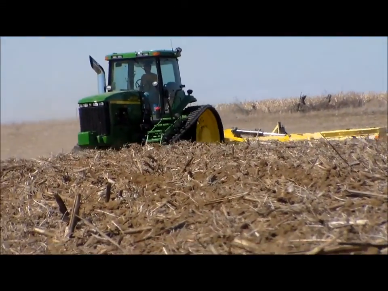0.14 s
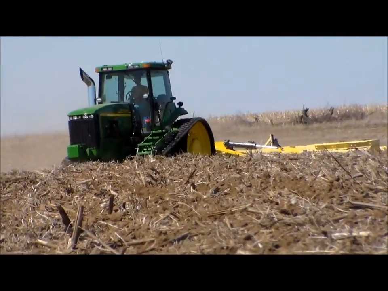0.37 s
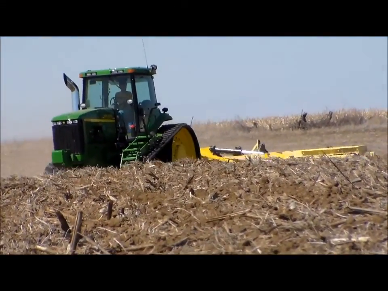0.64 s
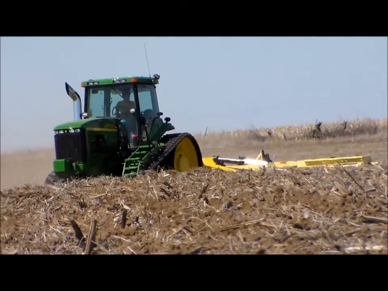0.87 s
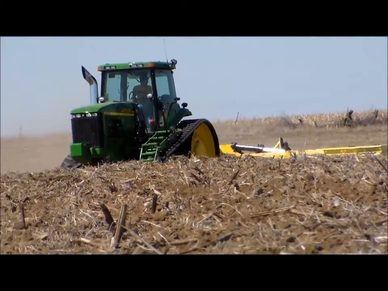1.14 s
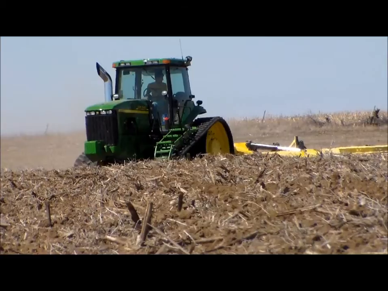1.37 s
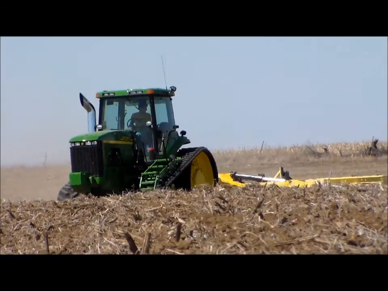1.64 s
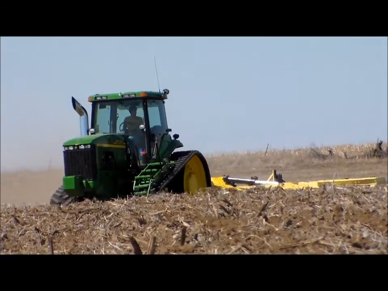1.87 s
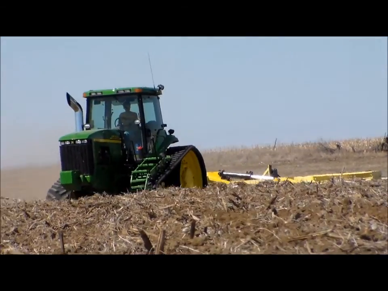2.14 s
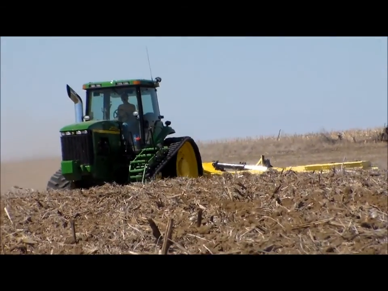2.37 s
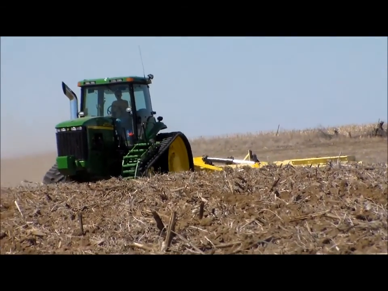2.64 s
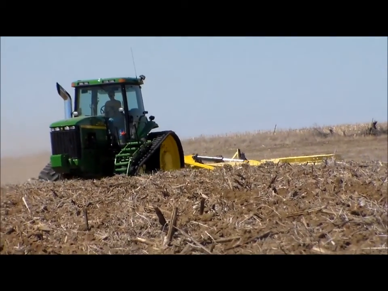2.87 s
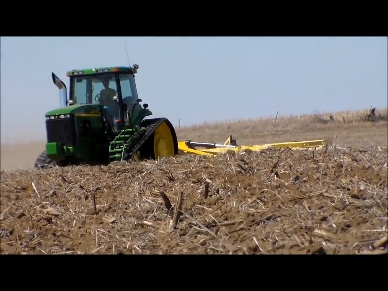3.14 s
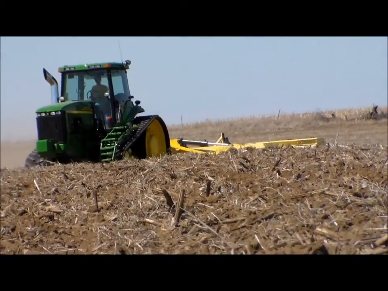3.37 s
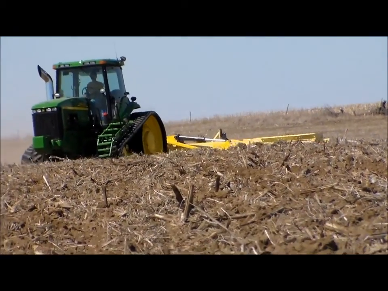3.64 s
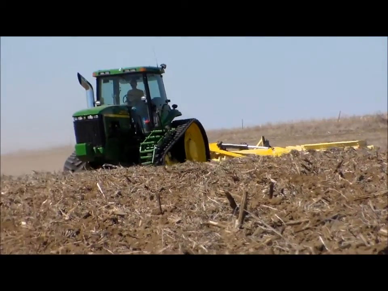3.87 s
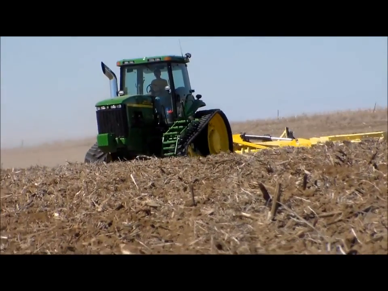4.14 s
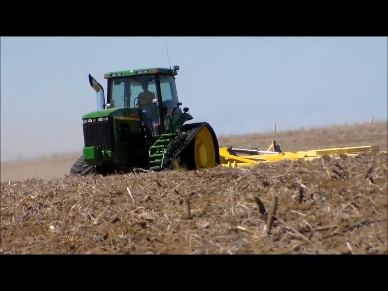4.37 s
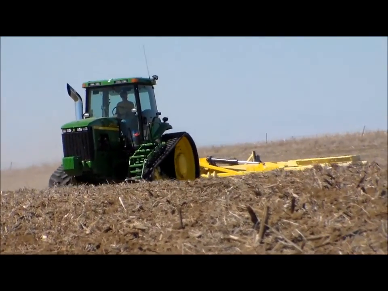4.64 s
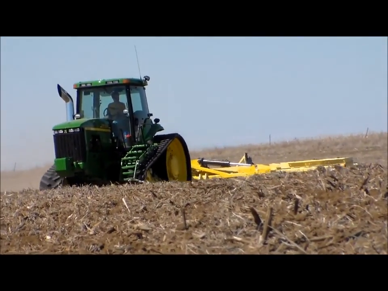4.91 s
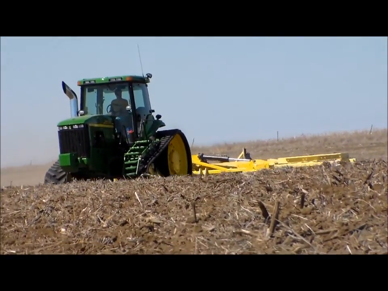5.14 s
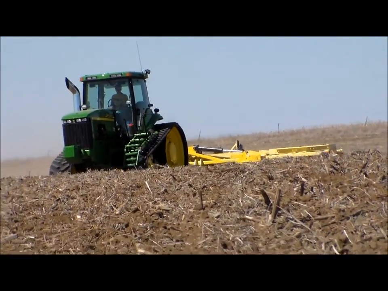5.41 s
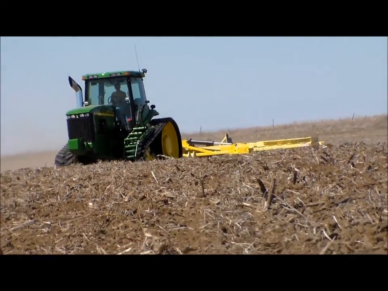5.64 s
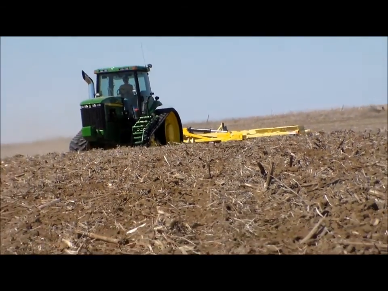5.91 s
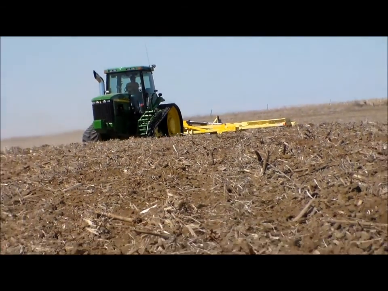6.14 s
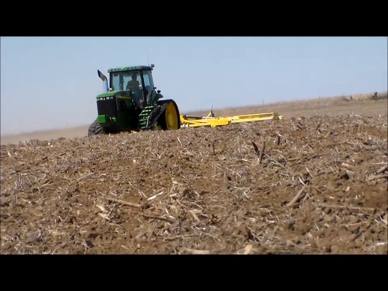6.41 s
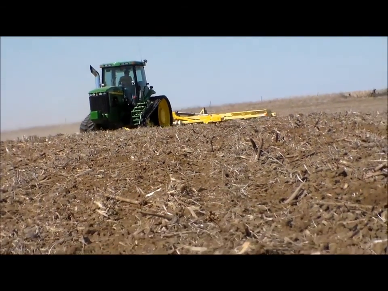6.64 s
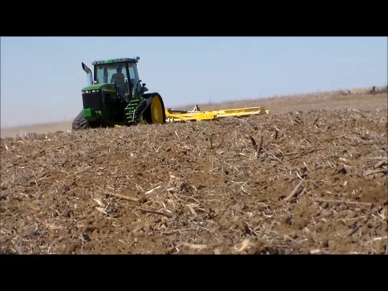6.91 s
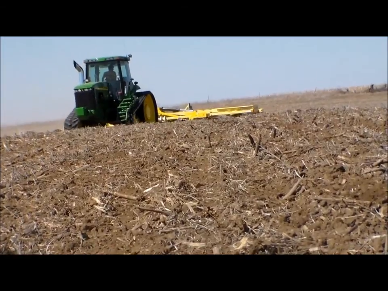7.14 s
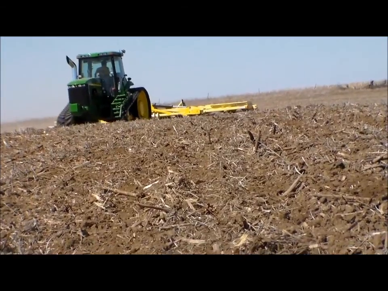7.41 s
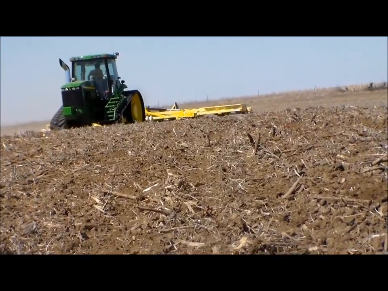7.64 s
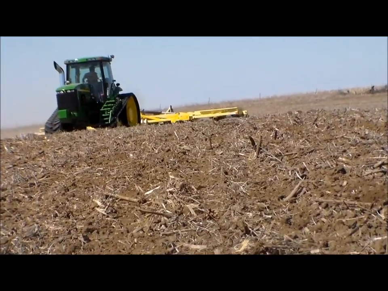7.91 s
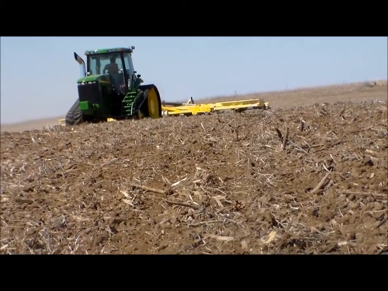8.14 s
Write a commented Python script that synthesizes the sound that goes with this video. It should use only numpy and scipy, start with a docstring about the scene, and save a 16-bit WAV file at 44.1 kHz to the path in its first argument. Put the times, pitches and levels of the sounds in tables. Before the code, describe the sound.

Outdoors, a laden diesel engine hums continuously at nearly constant speed, deep and slightly wavering, never passing or stopping. Brighter mechanical clatter surfaces in short patches, clearest from the middle onward. Rumbling wind gusts flutter against the handheld microphone, gentle at first and strongest in the later part, leaning left, with small thumps, momentary level dips, scattered ticks and thin background hiss.

```python
"""A six-cylinder diesel crawler pulls a tillage tool across a stubble slope, some way off.
From the start its exhaust drones as sine tones on the firing rate, over shaped-noise roar and gear whine; combustion
knock, noise bursts through panel resonances, comes and goes in gusty air. Filtered noise makes the wind's buffeting
and flutter, leaning mostly to the left port, and a faint hiss. Short pressure pulses pop from the first
second, when the level also begins to dip briefly now and then; dry clicks of decaying noise follow."""
import sys
import numpy as np
from scipy import signal
from scipy.fft import rfft, irfft, next_fast_len
from scipy.io import wavfile
from scipy.ndimage import uniform_filter1d, map_coordinates

SR = 44100
rng = np.random.default_rng(int(sys.argv[2]) if len(sys.argv) > 2 else 0)


def unload_audio(sound):
    """Save the sound as a 16-bit wav file, at the path given as the first command line argument."""
    columns = np.transpose(np.atleast_2d(sound))
    # keep every value between -1 and 1, then stretch to whole-number steps
    steps = np.round(np.clip(columns, -1, 1) * 32767)
    wavfile.write(sys.argv[1], SR, steps.astype(np.int16))


def gain_from_decibels(decibels):
    """Convert decibel values to linear amplitude factors."""
    exponent = np.asarray(decibels, float) / 20
    return 10 ** exponent


N = 365148  # samples

# Spectrum of the hiss. Each row: frequency in Hz, relative density in dB per Hz.
HISS_SPECTRUM = [(500, -24.5), (1200, -4), (2500, 0.5), (7500, -5.5), (9500, -4), (12000, -6.5),
                 (14300, -6.5), (15000, -61)]
# Gusts that set the ports fluttering. Each row: middle in seconds, length in seconds,
# relative flutter level on the louder port in dB, left over right in dB.
FLUTTER_GUSTS = [(0.217, 0.074, -44, 17), (0.4, 0.093, -46, 14), (0.586, 0.095, -42, 23),
                 (1.123, 0.078, -54, 4), (1.365, 0.098, -59, 8), (1.962, 0.086, -51.5, 12),
                 (2.19, .08, -48.5, 16), (2.328, .1, -44, 16), (2.437, .07, -49, 16), (2.672, .1, -44.5, 5),
                 (3.399, 0.093, -50, -2), (3.648, .14, -43, 14), (3.94, .14, -50, 9),
                 (4.122, 0.13, -51, -7), (4.405, .12, -51.5, 10), (4.65, .1, -56, -3),
                 (5.03, 0.082, -51, 12), (5.194, 0.086, -39.5, 15), (5.298, 0.056, -45.5, 13),
                 (5.422, .16, -35.5, 13), (5.53, .06, -42, 18), (5.623, .12, -42.5, 13),
                 (5.71, .05, -41, 15), (5.78, 0.078, -34, 20), (5.918, .08, -37, 21),
                 (6.256, .22, -37.5, 17), (6.492, .1, -42.5, -1.5), (6.769, .2, -39, 19),
                 (6.93, .1, -47.5, 12), (7.293, 0.077, -46.5, 8), (7.56, .16, -43.5, -3),
                 (7.878, .16, -42, 14), (8.126, .22, -37.5, 19)]


def unit(x):
    """Normalization by the root mean square: x scaled to rms 1."""
    return x / np.sqrt(np.mean(x ** 2) + 1e-20)


def curves(rows):
    """Linear interpolation in time: one value per sample for each column after the time."""
    seconds, *columns = np.transpose(rows)
    return [np.interp(np.arange(N) / SR, seconds, column) for column in columns]


def wobble(rate):
    """Band-limited random modulation: a smooth curve through rate random knots a second."""
    knots = rng.standard_normal(int(N * rate / SR) + 4)
    return map_coordinates(knots, [np.arange(N) * rate / SR])


def filtered(x, response):
    """Linear filtering: the spectrum of x times a complex response of frequency."""
    size = next_fast_len(N + 8192)
    return irfft(rfft(x, size) * response(np.fft.rfftfreq(size, 1 / SR)), size)[..., :N]


def coloured(x, spectrum):
    """Spectral shaping: x given the (Hz, dB) spectrum, on a log frequency scale, at rms 1."""
    f, db = np.transpose(spectrum)
    return unit(filtered(x, lambda hz: gain_from_decibels(np.interp(np.log(hz + 1), np.log(f), db))))


def noise():
    """White noise: independent samples with a flat expected spectrum."""
    return rng.standard_normal(N)


def swell(middle, length):
    """Gaussian envelope: a smooth rise and fall whose width at half height is length, in seconds."""
    return 0.5 ** ((2 * (np.arange(N) / SR - middle) / length) ** 2)


def exhaust(firings, drone_db):
    """Harmonics of a pulse train: the two banks of three differ, which adds the half multiples."""
    # Exhaust tones. Each row: multiple of the firing rate, level in dB relative to the drone.
    tone_levels = [(.5, -22.5), (1, 0.5), (1.5, -17.5), (2, -21.5), (2.5, -29), (3, -30.5), (3.5, -49.5),
                   (4, -42.5), (5, -51.5)]
    # Gear whine. Each row: multiple of the firing rate, middle rms level in dB.
    whine_levels = [(7.8, -77), (13, -77), (16.5, -81)]
    # Engine roar under the tones. Each row: frequency in Hz, relative density in dB per Hz.
    roar_spectrum = [(25, -28), (45, -9), (90, 5), (200, -10.5), (300, -17.5), (450, -22.5), (750, -28.5),
                     (900, -34.5), (1300, -60), (3000, -120)]
    tones = 0
    for k, db in tone_levels:
        # the higher the multiple, the less steady its level and phase
        phase = 2 * np.pi * (k * firings + rng.random()) + 0.044 * k * wobble(9.4)
        tones = tones + gain_from_decibels(db + 0.59 * k * wobble(6)) * np.sin(phase)
    roar = gain_from_decibels(-18.0 + 1.6 * wobble(12)) * coloured(noise(), roar_spectrum)
    whine = 0
    for k, db in whine_levels:
        phase = 2 * np.pi * k * firings + 0.5 * wobble(12)
        whine = whine + gain_from_decibels(db + 3.1 * wobble(3.4)) * np.sin(phase)
    return gain_from_decibels(drone_db) * (np.sqrt(2) * tones + roar) + np.sqrt(2) * whine


def carried():
    """Frequency-dependent transmission: clear air lifts most the register nearest each spell's brightness, in dB."""
    # How well the air carries the knock. Each row: time in seconds, relative low clatter level in dB.
    air = [(0.0, -63), (0.75, -61.5), (0.95, -59.5), (1.17, -63.5), (1.35, -59.5), (1.8, -60.5), (2.8, -60),
           (4.3, -59.5), (5.2, -64), (5.9, -62.5), (6.6, -59), (7.5, -58), (7.95, -66.5), (8.28, -63)]
    # Spells of clear air. Each row: middle in seconds, length in seconds, greatest lift in dB, brightness 0-1.
    clear_spells = [(0.396, 0.12, 0.5, 0.6), (0.984, .25, 4, .6), (1.38, 0.13, 2, 1), (1.73, .15, 4.5, 1),
                    (2.058, 0.15, 4, 0.9), (2.335, .15, 4.5, 0.7), (2.6, .15, 5, .9),
                    (3.145, 0.19, 7.5, .35), (3.327, .2, 8, 1), (3.55, 0.17, 5, 0.86), (3.92, 0.12, 6, 0.8),
                    (4.073, 0.19, 8.5, 0.7), (4.299, 0.2, 14.5, 0.96), (4.618, .15, 8, 0.88),
                    (4.846, 0.34, 6, 0.99), (5.604, 0.26, 5.5, 1), (5.887, 0.17, 14, 0.99),
                    (6.226, 0.24, 8.5, 1), (6.484, 0.06, 7, 0.8), (7.075, 0.29, 13.5, 0.98),
                    (7.348, 0.28, 12, 1), (7.829, .22, 9, 0.91), (8.05, 0.15, 5, .5), (8.28, 0.18, 9, 0.79)]
    low_db, = curves(air)
    change_db = low_db - low_db.mean()
    # the middle and treble each follow a share of the low clatter's changes
    still_db = np.array([low_db - 1, -69 + 0.5 * change_db, -74 + 0.41 * change_db])
    place = np.array([[0], [0.5], [1]])  # brightness of the low, middle and treble registers
    reach = 0.48  # spread of a lift to either side of its brightness
    lift_db = 0
    for middle, length, db, bright in clear_spells:
        share = np.exp(-((place - bright) / reach) ** 2)
        lift_db = lift_db + db * share * swell(middle, length)
    return still_db + lift_db


def shimmer(x, depth_db):
    """Refraction: moving air bends the path, making random patches of gain over pitch and time."""
    spectra = signal.stft(x, nperseg=512)[2]
    field = rng.standard_normal(spectra.shape[-2:])
    field = uniform_filter1d(field, size=10, axis=0)  # over frequency
    field = uniform_filter1d(field, size=8, axis=1)  # over time
    return unit(signal.istft(spectra * gain_from_decibels(depth_db * unit(field)), nperseg=512)[1][..., :N])


def knock(firings):
    """Forced resonance: a noise burst at each firing rings the panels; moving air swells each register."""
    # Resonances of block and panels. Each row: centre in Hz, width in Hz, relative level in dB.
    resonances = [(1030, 155, -1.5), (1213, 138, -2), (1635, 310, -4.5), (2234, 146, -3.5),
                  (2670, 233, -4.5), (3377, 200, -6), (3854, 350, -6), (4576, 140, -3), (4904, 94, -3),
                  (5507, 110, -3.5), (5950, 140, -7.5), (6600, 310, -9), (6870, 180, -9.5), (7540, 400, -8),
                  (8460, 1100, -15), (9900, 370, -18), (10000, 1100, -28.5)]
    low_db, middle_db, treble_db = carried()
    firing = firings.astype(int)
    # every other firing is stronger on average, and each has its own random strength
    strength = gain_from_decibels(3.8 * (firing % 2) + 2.9 * rng.standard_normal(firing[-1] + 1)[firing])
    burst = strength * np.exp(-(firings % 1) / 0.51)  # decay as a fraction of the firing period

    def panels(f):
        """Parallel resonators: a sum of band-pass responses with alternating signs."""
        return sum((-1) ** k * gain_from_decibels(db) * 1j * f * width / (centre * centre - f * f + 1j * f * width)
                   for k, (centre, width, db) in enumerate(resonances))

    def below(f, hz):
        """Low-pass response: half amplitude at the crossover frequency hz."""
        return 1 / (1 + (f / hz) ** 12)

    # Each row: level in dB, pulsed share, patchiness in dB, share astray, band response.
    registers = [(low_db, 0.6, 1.5, 0.15, lambda f: below(f, hz=1960)),
                 (middle_db, 0.7, 2.2, 0.17, lambda f: below(f, hz=4310) - below(f, hz=1910)),
                 (treble_db, 1.2, 2.2, 0.3, lambda f: 1 - below(f, hz=4330))]
    sound = 0
    for db, pulsed, patchy_db, astray, band in registers:
        drive = (1 + pulsed * burst) * rng.standard_normal((2, N))
        near, stray = (shimmer(filtered(d, lambda f: band(f) * panels(f)), patchy_db) for d in drive)
        # a little stray sound differs from port to port
        ports = near + astray * stray * [[1], [-1]]
        sound = sound + gain_from_decibels(db + 0.29 * wobble(14)) * ports
    return sound


def fluttering(buffet_db):
    """Superposition of amplitudes: flutter on each port in dB, a floor that follows the wind plus gusts."""
    middle_db = np.array([[-56.5], [-59.5]])  # left and right port, at the mean wind strength
    growth = np.array([[0.65], [0.2]])  # dB gained per dB of wind
    floor_db = middle_db + growth * (buffet_db - buffet_db.mean())
    gusts = 0
    for middle, length, db, lean_db in FLUTTER_GUSTS:
        # only the port that the gust leans away from is weakened
        weaker_db = np.clip([[-lean_db], [lean_db]], 0, None)
        gusts = gusts + gain_from_decibels(db - weaker_db) * swell(middle, length)
    return 20 * np.log10(gain_from_decibels(floor_db) + gusts)


def wind():
    """Turbulent pressure: slow buffeting and brighter, lumpy flutter, mostly unrelated from port to port."""
    # The wind's slowly changing strength. Each row: time in seconds, relative buffet level in dB.
    strength = [(0.0, -39), (0.3, -31.5), (0.9, -34.5), (1.15, -31.5), (1.75, -37.5), (2.3, -31.5),
                (2.7, -31.5), (3.1, -37), (4.4, -33), (4.8, -38), (5.45, -26.5), (6.05, -36), (6.27, -25),
                (6.6, -35), (6.78, -27.5), (7.15, -33), (7.5, -30.5), (8.28, -34)]
    # Each row: frequency in Hz, relative density in dB per Hz.
    buffet_spectrum = [(8, -16.5), (22, 4), (33, 6), (54, 3), (100, 4.5), (190, -2.5), (300, -21.5),
                       (500, -51.5), (1500, -120)]
    # Each row: frequency in Hz, relative density in dB per Hz.
    flutter_spectrum = [(60, -11), (150, 3.5), (250, -1), (450, -16), (900, -32), (1600, -44.5),
                        (4000, -120)]
    buffet_db, = curves(strength)
    ports, common = [], noise()
    for share_db, db in zip((-0.5, -6), fluttering(buffet_db)):  # left, right
        buffet = coloured(gain_from_decibels(3.5 * wobble(22)) * (noise() + 0.59 * common), buffet_spectrum)
        flutter = coloured(gain_from_decibels(4.0 * wobble(110) + 3.1 * wobble(30)) * noise(), flutter_spectrum)
        # the flutter dies away quickly once the gust is weak
        fading_db = -1.5 * np.clip(-56 - db, 0, None)
        buffet = gain_from_decibels(buffet_db + share_db + 1.2 * wobble(8)) * buffet
        ports.append(buffet + gain_from_decibels(db + 5.0 + fading_db) * flutter)
    return np.array(ports)


def hiss(level_db):
    """Stationary random noise: unrelated shaped noise on each side, at an rms level in dB."""
    return gain_from_decibels(level_db) * np.array([coloured(noise(), HISS_SPECTRUM), coloured(noise(), HISS_SPECTRUM)])


def pops():
    """Pressure impulse: each eddy is a sudden push and its rebound, of either sign, leaning to one port."""
    # The hardest eddies. Each row: start in seconds, relative level in dB, left over right in dB.
    hard_eddies = [(0.21, -43, 6), (0.589, -40.5, 13), (2.166, -42, 9), (2.384, -43, 8),
                   (3.373, -44.5, -2.5), (5.032, -45, 10), (5.159, -47, 7), (5.19, -44, 5), (5.484, -43, 1),
                   (5.61, -44, 6), (5.628, -38, 16), (5.706, -46, 10.0), (5.777, -40, 13.0),
                   (6.325, -33.5, 21), (6.542, -45, -1), (6.703, -44, -3), (6.802, -40, 18),
                   (7.389, -42.5, 16), (8.061, -45, 12), (8.123, -42, 9)]
    out = np.zeros((2, N + SR))
    u = np.arange(SR // 50) / SR / 0.00061  # time in units of 0.61 ms
    # smaller eddies fall by chance around the gusts, leaning on average to the left
    small_eddies = []
    for middle, length, *_ in FLUTTER_GUSTS:
        a, b, c = rng.standard_normal(3)
        small_eddies.append((middle + length / 2 * a, -49.5 + 2 * b, 6.5 * (1 + c / 2)))
    for start, db, lean_db in hard_eddies + small_eddies:
        push = u * (1 - u / 3) * np.exp(1 - u) * np.sign(rng.random() - 0.5)
        ports = gain_from_decibels([[lean_db / 2], [-lean_db / 2]])
        out[:, round(start * SR):][:, :len(u)] += gain_from_decibels(db + 11) * ports / ports.mean() * push
    return filtered(out[:, :N], lambda f: 1 / (1 + 1j * f / 3000) ** 2)


def dips():
    """Exponential relaxation: a gain that drops within a millisecond or two and creeps back."""
    # Each row: start in seconds, depth in dB, recovery time constant in seconds.
    level_dips = [(0.212, 3.5, 0.07), (0.73, 5, 0.053), (1.1, 3, 0.1), (2.15, 5, 0.035), (4.433, 8.5, 0.07),
                  (5.165, 5, 0.26), (5.62, 3, 0.14), (5.79, 3.5, 0.084), (6.241, 4.5, 0.095),
                  (6.329, 6.5, 0.056), (6.808, 7, 0.061), (7.55, 5.5, 0.035), (8.04, 4, 0.042)]
    t = np.arange(N) / SR
    db = 0
    for start, depth_db, recovery in level_dips:
        drop = np.clip((t - start) / 0.0017, 0, 1)
        db = db - depth_db * drop * np.exp(-np.clip(t - start, 0, None) / recovery)
    return gain_from_decibels(db)


def ticks():
    """Transient excitation: dry clicks, decaying noise in a broad band, a little different at each port."""
    # Each row: start in seconds, relative level in dB, nominal centre in Hz.
    clicks = [(0.9942, -35, 3900), (1.3542, -38.5, 2600), (4.429, -52, 2830), (4.79, -47, 2590),
              (5.161, -46.5, 3060), (6.314, -41, 3630), (6.543, -47, 2620), (6.8014, -60, 2540),
              (7.1263, -43, 6580), (7.4704, -51.5, 2700)]
    out = np.zeros((2, N + SR))
    t = np.arange(SR // 100) / SR
    for start, db, hz in clicks:
        near, stray = rng.standard_normal((2, len(t)))
        click = np.exp(-t / 0.00073) * (near + 0.3 * stray * [[1], [-1]])
        b, a = signal.butter(1, [0.5 * hz, min(1.9 * hz, 18000)], "bandpass", fs=SR)
        out[:, round(start * SR):][:, :len(t)] += gain_from_decibels(db + 1.5) * signal.lfilter(b, a, click)
    return out[:, :N]


def scene():
    """Superposition: engine in the middle, wind on the ports, a faint air hiss on each side."""
    # The governor hunts as the load changes. Each row: time in seconds, firing rate in Hz, drone gain in dB.
    engine = [(0.0, 93.2, -30), (0.15, 93.4, -25.5), (0.45, 92.9, -27.5), (1.2, 94.14, -26),
              (1.6, 93.2, -26.5), (2.2, 93.15, -26.5), (2.83, 92.56, -27), (3.2, 92.9, -25),
              (3.75, 94.1, -26.5), (4.6, 92.88, -25.5), (5.2, 93.02, -27.5), (5.9, 93.9, -26.5),
              (6.3, 93.16, -27), (6.87, 93, -27.5), (7.15, 93.36, -25.5), (7.47, 92.8, -26.5),
              (7.88, 93.77, -27.5), (8.28, 93.4, -27)]
    firing_hz, drone_db = curves(engine)
    firings = np.cumsum(firing_hz) / SR  # firings so far, with fractions
    sources = exhaust(firings, drone_db) + knock(firings) + wind() + hiss(-70.0) + pops() + ticks()
    return dips() * sources


def low_pass(x):
    """Removes everything above the highest recorded frequency."""
    return signal.sosfilt(signal.butter(12, 14980, fs=SR, output="sos"), x)


def record(dry):
    """Saturation and band limiting: peaks are rounded off, steady preamp hiss joins, the top is cut."""
    rounded = dry / (1 + np.abs(dry / 0.15) ** 4) ** (1 / 4)
    mix = filtered(rounded + hiss(-71.5), lambda hz: hz < 14240)
    return low_pass(mix)


dry = scene()
out = record(dry)
unload_audio(out)
```